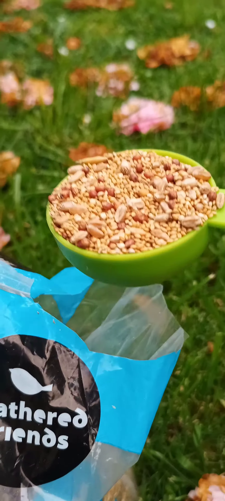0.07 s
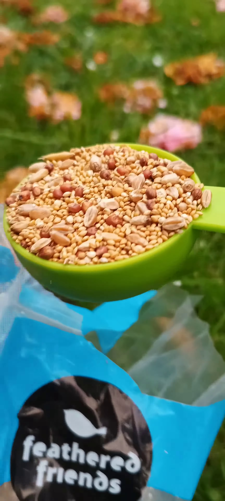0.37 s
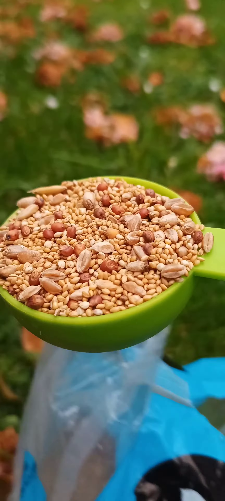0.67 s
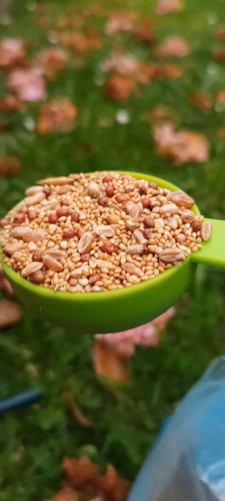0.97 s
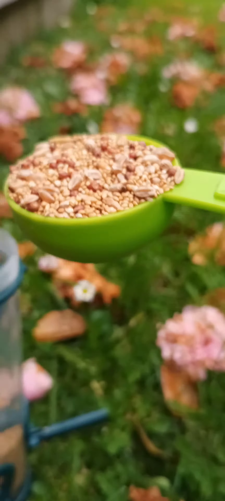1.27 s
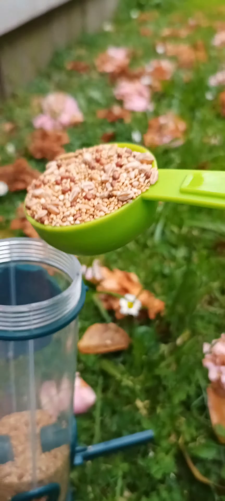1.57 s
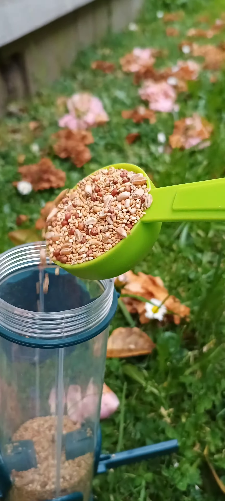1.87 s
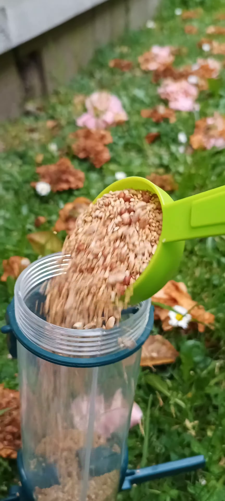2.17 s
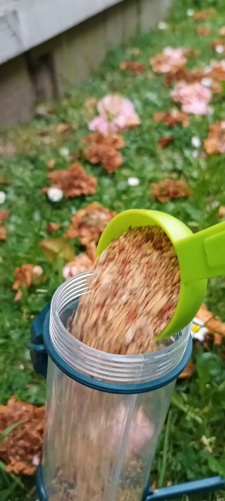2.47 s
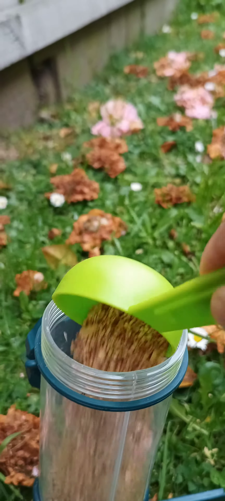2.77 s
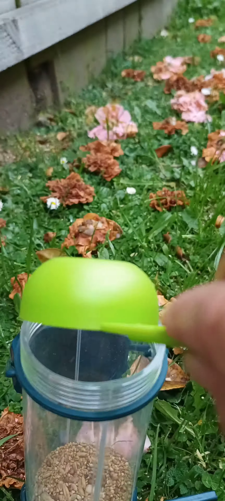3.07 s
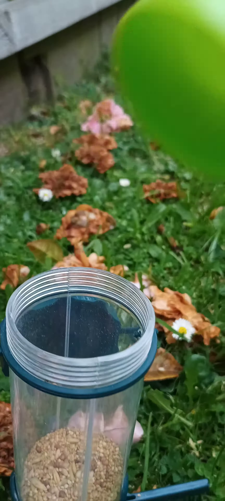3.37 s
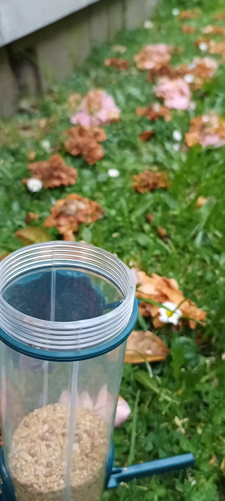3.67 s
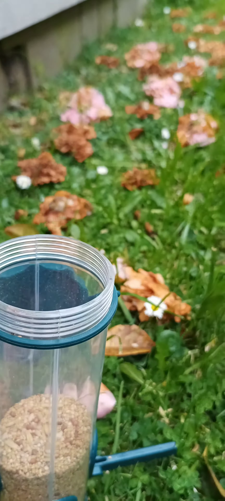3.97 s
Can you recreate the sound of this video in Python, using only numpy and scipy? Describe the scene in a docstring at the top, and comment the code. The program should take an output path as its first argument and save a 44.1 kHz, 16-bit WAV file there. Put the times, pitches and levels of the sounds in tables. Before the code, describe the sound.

Dry seed pours and rattles into a plastic tube, with wind rumbling on the microphone.

```python
"""A garden, close to a plastic tube feeder: dry bird seed slides off a plastic scoop and rattles down it.
A few lone seeds lead a stream of tiny impacts; the tube knocks hollowly, rings and darkens as it fills.
The plastic seed bag crinkles before and after. A rising wind rumbles and thuds on each of the two
microphone ports on its own, over a faint outdoor hiss."""
import sys
import numpy as np
from scipy import signal
from scipy.fft import rfft, irfft
from scipy.io import wavfile
from scipy.ndimage import uniform_filter1d

SR = 44100
rng = np.random.default_rng(int(sys.argv[2]) if len(sys.argv) > 2 else 0)


def unload_audio(sound):
    """Save the sound as a 16-bit wav file, at the path given as the first command line argument."""
    columns = np.transpose(np.atleast_2d(sound))
    # keep every value between -1 and 1, then stretch to whole-number steps
    steps = np.round(np.clip(columns, -1, 1) * 32767)
    wavfile.write(sys.argv[1], SR, steps.astype(np.int16))


N = 176400
T = np.arange(N) / SR
HZ = np.maximum(np.arange(N // 2 + 1) * SR / N, 1)
TOP_HZ = 15850
PORT_LAG_S = .0004  # sound from the right reaches the left port later

# seed stream: builds as the scoop tips, drops as it empties, then the heap settles (t/s, level/dB)
SEED_FLOW = [(2.04, -51), (2.2, -35), (2.4, -28.5), (2.55, -31), (2.775, -29), (2.83, -43), (3.04, -56.5),
             (3.12, -65.5)]


def amp(db):
    """Decibels to gain."""
    return 10 ** (np.asarray(db) / 20)


def unit(x):
    """Scale to rms 1."""
    return x / np.sqrt(np.mean(x ** 2))


def curve(rows):
    """Envelope through (t/s, value) breakpoints."""
    return np.interp(T, *np.array(rows).T)


def colour(rows):
    """EQ curve through (f/Hz, level/dB) points."""
    hz, db = np.array(rows).T
    return amp(np.interp(np.log(HZ), np.log(hz), db))


def shape(x, gain):
    """Filter by a gain at each frequency."""
    return irfft(rfft(x) * gain, N)


def lowpass(hz, power):
    """Roll-off curve, 6 dB down at hz."""
    return 1 / (1 + (HZ / hz) ** power)


def noise(gain):
    """Coloured noise, unrelated left and right."""
    return unit(shape(rng.standard_normal((2, N)), gain))


def pan(db):
    """Constant-power gains, the left db above the right."""
    return unit(amp(np.array([[db], [-db]]) / 2))


def even(x, seconds):
    """Hold the short-term rms near 1."""
    power = uniform_filter1d(x ** 2, max(int(seconds * SR), 2), axis=-1)
    return x / np.sqrt(np.abs(power) + 1e-12)


def fade(t, t60):
    """Exponential decay, 60 dB in t60 seconds."""
    return np.exp(-np.log(1000) * t / t60)


def add(out, start, x):
    """Mix a short sound in at a time."""
    i = int(start * SR)
    out[:, i:i + x.shape[1]] += x[:, :N - i]


def grains(per_s, spread_db, start, end, count=12000):
    """Tiny dry ticks, many weak and few strong, each reaching the two ports at its own moment."""
    when, strength, chance = rng.random((count, 3)).T
    place, left_jitter, right_jitter = rng.standard_normal((count, 3)).T
    jitter_s, pan_spread_db = .00005, 7
    t = np.arange(96) / SR
    sounding = chance < per_s * (end - start) / count
    size = amp(spread_db * np.minimum(-np.log(strength), 5.5)) * sounding
    ticks = size[:, None] * rng.standard_normal((count, len(t))) * fade(t, t60=.0019)
    out = []
    for side, lag in ((-1, PORT_LAG_S + jitter_s * left_jitter), (1, jitter_s * right_jitter)):
        arrival = np.maximum(start + when * (end - start) + lag, 0)
        samples = (arrival * SR).astype(int)[:, None] + np.arange(len(t))
        panned = ticks * amp(side * pan_spread_db * place / 2)[:, None]
        out.append(np.bincount(samples.ravel(), panned.ravel(), N)[:N])
    return np.array(out)


def clicks(rows, t60, octaves):
    """Hard contacts: each a short crack in a band of its own, broader the harder the blow."""
    out, t = np.zeros((2, N)), np.arange(2048) / SR
    f = np.maximum(np.arange(len(t) // 2 + 1) * SR / len(t), 1)
    hardest = max(db for start, db, hz in rows)
    for start, db, hz in rows:
        burst = rng.standard_normal((2, len(t))) * fade(t, t60)
        width = octaves * amp((db - hardest) / 2)
        band = 1 / (1 + (np.log2(f / hz) / width) ** 2)
        crack = irfft(rfft(np.roll(burst, 32, axis=1)) * band)  # the shift leaves room for pre-ring
        add(out, start, amp(db) * crack / abs(crack).max(axis=1, keepdims=True))
    return out


def garden():
    """Faint open-air hiss and the hollow rush of the breeze."""
    # tone of the background hiss (f/Hz, level/dB)
    hiss_eq = [(200, -0.5), (400, -4), (1000, -6.5), (1500, -8), (2700, -15.5), (6000, -22), (8500, -32.5),
               (13000, -34.5), (15300, -26.5)]
    # level of the hiss, ducking briefly during the strongest wind (t/s, level/dB)
    hiss_level = [(0, -60.5), (.75, -58.5), (1.5, -62), (3.08, -53.5), (3.14, -66.5), (3.25, -54),
                  (3.5, -61), (3.85, -54)]
    # airy bands of the hollow rush (f/Hz, width/Hz, level/dB)
    rush_bands = [(860, 200, -1.5), (1470, 500, 0)]
    # level of the rush, ducking briefly during the strongest wind (t/s, level/dB)
    rush_level = [(0, -78.5), (1.6, -61.5), (2.75, -53), (3.08, -62.5), (3.14, -66), (3.2, -56),
                  (3.55, -57.5), (4, -44)]
    air = sum(amp(db) / (1 + (2 * (HZ - hz) / width) ** 2) for hz, width, db in rush_bands)
    return noise(colour(hiss_eq)) * amp(curve(hiss_level)) + noise(air) * amp(curve(rush_level))


def swells(width_hz=290):
    """Soft, narrow swells: faint ones in the background, and the tube's hollow ring as the pour ends."""
    # bell-shaped swells (centre t/s, half length/s, f/Hz, level/dB)
    rises = [(.696, 0.016, 1590, -58.5), (1.891, 0.028, 1430, -52), (2.925, .15, 895, -48.5),
             (3.714, 0.17, 1430, -48.5)]
    out = np.zeros((2, N))
    for at, length, hz, db in rises:
        band = noise(1 / (1 + (2 * (HZ - hz) / width_hz) ** 4))
        out += band * amp(db) * np.exp(-((T - at) / length) ** 2)
    return out


def wind():
    """Turbulence rumbles and flutters on each port; stronger gusts shed finer eddies."""
    # wind pressure on the left port (t/s, level/dB)
    left_gusts = [(0.0, -57), (0.11, -41.5), (0.15, -56), (0.5, -43), (0.63, -72), (0.74, -47.5),
                  (0.91, -54), (0.95, -30), (0.98, -46), (1.05, -34.5), (1.1, -57), (1.18, -25.5),
                  (1.3, -36), (1.33, -25.5), (1.42, -32), (1.46, -52), (1.57, -45.5), (1.63, -31.5),
                  (1.8, -26), (1.83, -47), (1.86, -21), (1.9, -43.5), (1.97, -57), (2.02, -28),
                  (2.07, -41.5), (2.18, -19.5), (2.29, -24), (2.35, -14), (2.74, -30.5), (2.85, -15),
                  (2.89, -20), (3.04, -16), (3.07, -20.5), (3.13, -14.5), (3.16, -24), (3.23, -15.5),
                  (3.28, -24.5), (3.42, -15), (3.87, -17.5), (3.92, -24), (3.94, -16.5), (4.0, -15)]
    # wind pressure on the right port (t/s, level/dB)
    right_gusts = [(0.0, -61.5), (0.4, -57.5), (1.29, -60), (1.35, -35), (1.4, -56), (1.45, -33.5),
                   (1.57, -59), (1.6, -36), (1.86, -22), (1.91, -36.5), (2.14, -37.5), (2.2, -22.5),
                   (2.31, -45), (2.36, -23), (2.66, -24.5), (2.7, -43), (2.74, -14.5), (2.87, -65),
                   (2.91, -21), (2.95, -28), (2.97, -16), (3.1, -28), (3.14, -63), (3.18, -33.5),
                   (3.22, -49), (3.25, -14), (3.38, -55.5), (3.45, -14), (3.67, -18), (3.73, -38),
                   (3.81, -14), (3.95, -15.5), (4.0, -40)]
    # eddies, coarse to fine (f/Hz, relative level/dB at the reference gust, growth/dB per dB of gust)
    eddy_bands = [(55.3, -20.5, 0.6), (84.3, -7, 0.77), (126.7, -5, 1.07), (185.8, -6.5, 1),
                  (285.2, -9.5, 2), (468, -20.5, 2.47)]
    trim_db, reference_db, eddy_octaves = -3, -22, .27
    flutter_db = 1.8 * noise(lowpass(hz=62, power=4))
    gust_db = np.array([curve(left_gusts), curve(right_gusts)]) + trim_db - reference_db + flutter_db
    turbulence = even(noise(lowpass(hz=250, power=2)), seconds=.034)
    rumble = np.zeros((2, N))
    for hz, db, growth in eddy_bands:
        band = np.exp(-.5 * (np.log2(HZ / hz) / eddy_octaves) ** 2)
        rumble += unit(shape(turbulence, band)) * amp(db + growth * gust_db)
    return rumble * amp(reference_db)


def buffets(low_hz=162, order=7.8):
    """Single eddies hit a port with a brief, brighter thud."""
    # eddy hits (t/s, length/s, level/dB, corner f/Hz, left over right/dB)
    hits = [(2.3, 0.11, -32, 648, 34), (2.832, 0.013, -18.5, 770, 22), (2.955, 0.0082, -19, 610, 29),
            (3.122, 0.0074, -17, 368, 40), (3.384, 0.023, -25, 586, 24.5), (3.414, 0.066, -22.5, 1004, 18),
            (3.472, 0.052, -15, 784, -13.5), (3.487, 0.034, -25.5, 1554, -16),
            (3.572, 0.033, -18.5, 750, 16), (3.743, 0.0297, -24, 575, 26.5)]
    out = np.zeros((2, N))
    for start, length, db, hz, pan_db in hits:
        envelope = np.interp(T - start, length * np.array([0, .2, .7, 1.3]), [.0013, 1, .45, .018])
        pink_band = np.sqrt(lowpass(hz, 2 * order) / HZ) / (1 + (low_hz / HZ) ** 4)
        thud = noise(pink_band) * envelope
        rms = np.sqrt(np.sum(thud ** 2, axis=1, keepdims=True) / (length * SR))
        out += thud / rms * amp(db) * pan(pan_db)
    return out


def soften(pressure):
    """The strongest blasts of air are rounded off and dulled."""
    limit = amp(-3.5)
    return shape(limit * np.tanh(pressure / limit), lowpass(hz=2920, power=6))


def bag():
    """Thin plastic crinkles as it is moved; now and then a crease snaps."""
    # moves of the bag (t/s, attack/s, hold/s, release/s, level/dB)
    rustles = [(0.174, 0.017, 0.32, 0.047, -62.5), (0.487, 0.048, 0.00254, 0.0258, -47),
               (3.878, 0.028, .1, .05, -31.5)]
    # tone of the crinkle (f/Hz, level/dB)
    crinkle_eq = [(500, 7), (1500, -2.5), (4200, -2.5), (6500, -6), (8500, -24), (13000, -41), (15500, -17)]
    # snapping creases (t/s, peak level/dB, f/Hz)
    snaps = [(.0455, -21.5, 5550), (3.915, -16, 3860), (3.9695, -20, 5320)]
    effort = sum(amp(db) * np.interp(T - start, np.cumsum([0, attack, hold, release]), [0, 1, 1, 0]) ** 2
                 for start, attack, hold, release, db in rustles)
    ticks = grains(per_s=17000, spread_db=2.5, start=0, end=N / SR, count=24000)
    crinkle = unit(shape(ticks, colour(crinkle_eq)))
    return crinkle * effort * pan(db=-1) + clicks(snaps, t60=.0097, octaves=.21) * pan(db=-4)


def knock(start=2.157, hz=690, db=-21):
    """The first mass of seed lands and knocks one low, hollow note out of the tube."""
    t = np.maximum(T - start - np.array([[PORT_LAG_S], [0]]), 0)
    attack = 1 - np.exp(-t * hz)
    return amp(db) * np.sin(2 * np.pi * hz * t) * fade(t, t60=.045) * attack


def tube(x):
    """The plastic wall rings briefly; the echoes inside keep changing as the seed lands in new places."""
    # resonances of the wall (f/Hz, level/dB)
    wall_modes = [(950, -8), (1450, 10), (1970, -1), (2573, 6), (3600, 1.5)]
    ring_db, echo_db, echo_change_s = -12.5, -7, .06
    t = np.arange(4096) / SR
    ring = sum(amp(db) * np.sin(2 * np.pi * hz * t) for hz, db in wall_modes) * fade(t, t60=.06)
    out = x + amp(ring_db) * signal.fftconvolve(x, ring[None] / np.linalg.norm(ring), axes=1)[:, :N]
    hop = int(echo_change_s * SR)
    for i in range(0, N - 2 * hop, hop):
        echo = rng.standard_normal((2, len(t))) * fade(t, t60=.04)
        piece = x[:, i:i + 2 * hop] * np.sqrt(np.hanning(2 * hop))
        add(out, i / SR, amp(echo_db) * signal.fftconvolve(piece, echo / np.linalg.norm(echo[0]), axes=1))
    return out


def patter(start, end):
    """Middle-sized seeds tick at random through the stream, each with its own pitch and strength."""
    per_s, above_flow_db, range_db, lowest_hz = 150, 12.5, 14, 3600
    when, pitch, softness = rng.random((int(per_s * (end - start)), 3)).T
    at = start + when * (end - start)
    db = np.interp(at, *np.array(SEED_FLOW).T) + above_flow_db - range_db * softness
    hz = lowest_hz * (TOP_HZ / lowest_hz) ** pitch
    return clicks(list(zip(at, db, hz)), t60=.009, octaves=1.3)


def pour():
    """Small seeds, and big ones among them, strike the tube and the heap; the sound darkens as it fills."""
    # tone of the small impacts (f/Hz, level/dB)
    seed_eq = [(700, -24.5), (1150, -21), (1500, -4.5), (2600, -6.5), (4900, 2), (6600, 4), (8100, -2),
               (9300, -2), (11000, -6), (14000, -2), (14900, 6.5)]
    # big seeds hitting the tube (t/s, peak level/dB, f/Hz)
    strikes = [(1.977, -37, 5380), (1.995, -29, 5720), (2.1125, -13, 4500), (2.135, -25, 6800),
               (2.143, -25.5, 8000), (2.211, -20, 6500), (2.244, -15, 6050), (2.315, -13.5, 6470),
               (2.334, -13.5, 8340), (2.368, -18, 9100), (2.421, -14, 5000), (2.44, -19.5, 3730),
               (2.513, -20.5, 6600), (2.523, -14.5, 10600), (2.561, -18, 8550), (2.593, -21, 6400),
               (2.638, -21, 4300), (3.06, -46, 8500)]
    start, scoop_empty, end = SEED_FLOW[0][0], SEED_FLOW[4][0], SEED_FLOW[-1][0]
    trim_db, build_s = -1.5, .2
    fill_db_per_s, fill_flat_at_s = 16, 2.615
    ticks = grains(per_s=5000, spread_db=3, start=start, end=end)
    hiss = even(shape(ticks, colour(seed_eq)), seconds=.13)
    gate = np.clip((T - start) / build_s, 0, 1) * (T < end)  # the hiss fades in behind the patter
    stream = hiss * amp(curve(SEED_FLOW) + trim_db) * gate + patter(start, scoop_empty)
    lows = shape(stream, lowpass(hz=3000, power=4))
    fill_gain = amp(fill_db_per_s * (np.clip(T, start, end) - fill_flat_at_s))  # a rising low shelf
    big_seeds = clicks(strikes, t60=.012, octaves=1.19) * pan(db=-1)
    return tube(stream - lows + lows * fill_gain + big_seeds)


def scene():
    """Seed, bag, wind and garden together."""
    return pour() + knock() + bag() + soften(wind() + buffets()) + garden() + swells()


def record(dry):
    """A steep low-pass cuts the very top."""
    return signal.sosfilt(signal.ellip(10, .2, 80, TOP_HZ, fs=SR, output="sos"), dry)


dry = scene()
out = record(dry)
unload_audio(out)
```